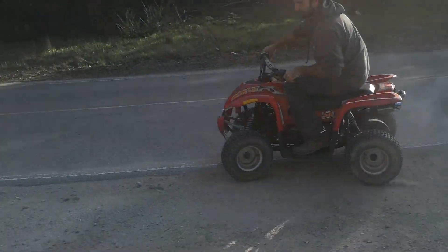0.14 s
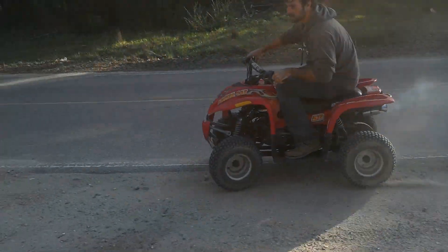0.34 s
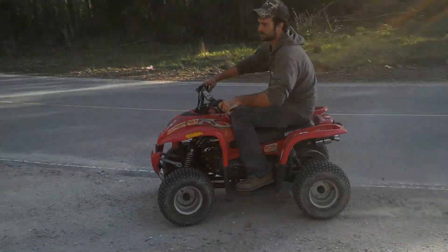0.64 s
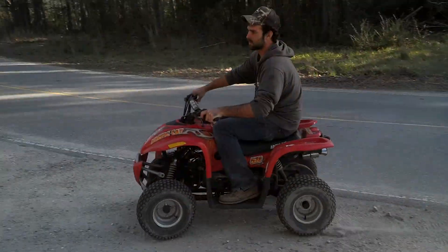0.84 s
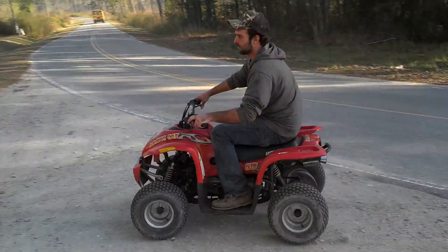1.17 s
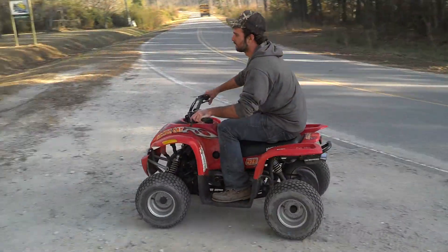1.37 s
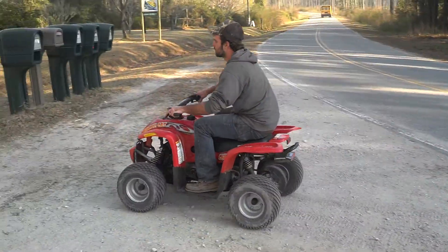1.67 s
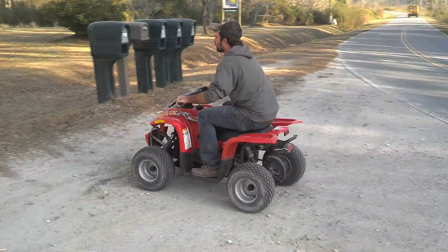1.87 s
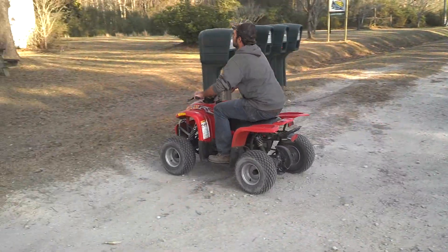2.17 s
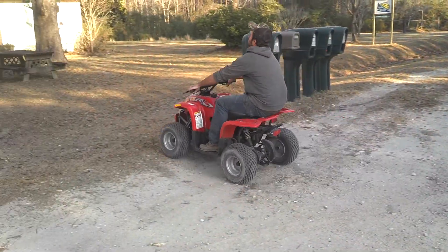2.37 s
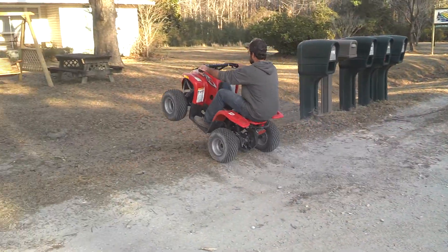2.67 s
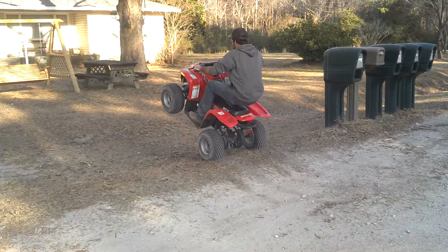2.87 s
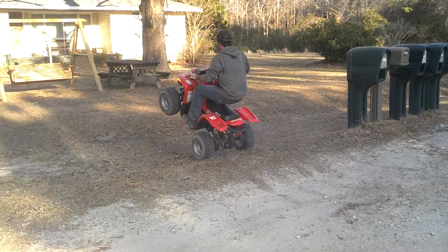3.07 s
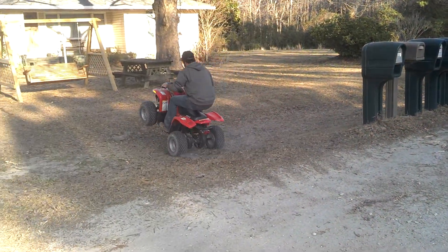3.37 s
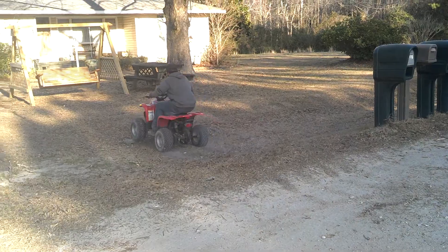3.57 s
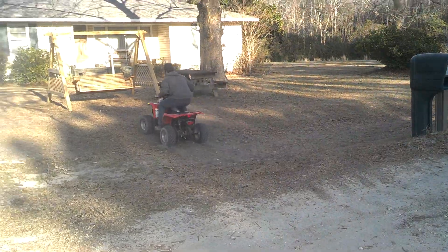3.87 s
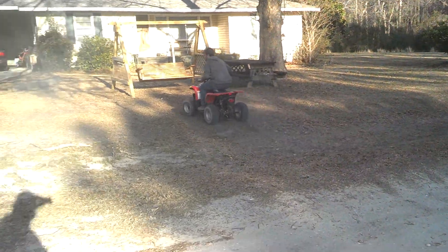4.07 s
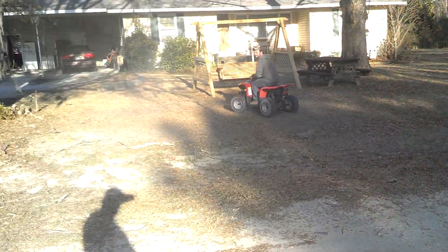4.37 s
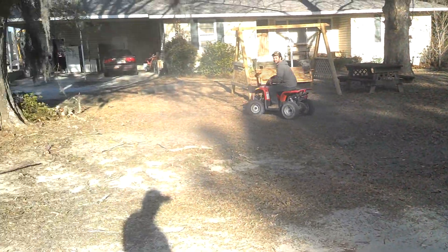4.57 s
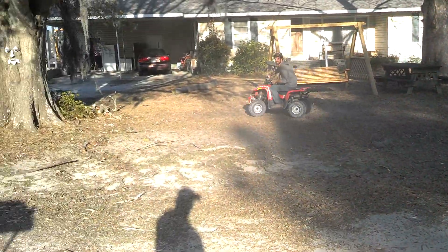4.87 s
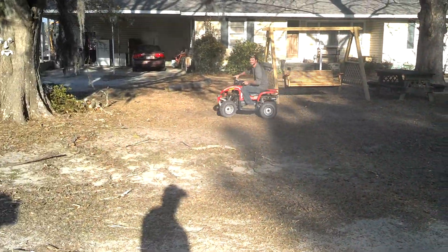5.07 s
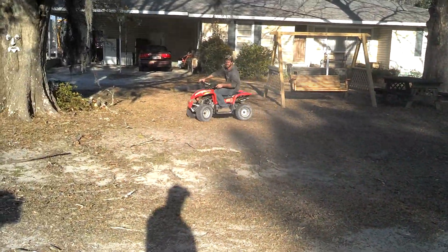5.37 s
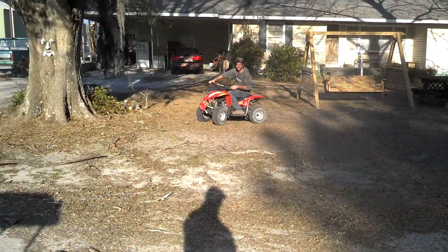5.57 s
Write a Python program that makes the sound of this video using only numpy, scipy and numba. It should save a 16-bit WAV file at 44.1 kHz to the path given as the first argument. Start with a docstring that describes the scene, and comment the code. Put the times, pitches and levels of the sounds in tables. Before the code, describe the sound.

Outdoors in a dirt yard, a small quad bike alternates between a continuous, raspy two-stroke buzz and uneven popping off the throttle. It starts under power, coasts, gives two rising revs, coasts again and finally pulls once more. A soft, gritty rush of tyres runs below the engine throughout. The microphone is a few metres off, giving a wide stereo sound with slight, dull reflections.

```python
"""A small two-stroke quad buzzes round a dirt yard, revving, then coasting with a stutter.
On throttle every crank turn fires; off throttle it catches for a few turns at a time.
Each turn's pulse rings the exhaust, silencer shell, tail pipe and fins, and trees and a house front
echo the engine. Tyres hiss on grit underneath, a few metres away, all in widened stereo."""
import sys
import numpy as np
from scipy import signal
from scipy.fft import rfft, irfft
from scipy.io import wavfile
from scipy.ndimage import uniform_filter1d
from numba import njit

SR = 44100
rng = np.random.default_rng(int(sys.argv[2]) if len(sys.argv) > 2 else 0)


def dump_mix(stems):
    """Bounce the given channels to the path in sys.argv[1] as a 16-bit WAV at rate SR."""
    frames = np.atleast_2d(stems).T  # one column per channel
    limited = np.clip(frames, -1, 1)  # hard clip at full scale
    pcm = np.round(limited * 32767).astype(np.int16)
    wavfile.write(sys.argv[1], SR, pcm)


N = 253134


def engine():
    """Exhaust pulses ring each part; levels and pitches shift as the quad shows another side."""
    # Each row: time in seconds, then thump, lower pipe, upper pipe, shell and rasp faders in dB.
    levels = [(0, -18, -14, -19.5, -34, -39), (.4, -15, -13.5, -23.5, -50, -36),
              (.75, -8.5, -11.5, -17, -34, -33), (.95, -18.5, -19.5, -25, -43, -32.5),
              (1.3, -20, -17.5, -18.5, -42, -32), (1.95, -17, -24.5, -21.5, -31.5, -35),
              (2.17, -13, -20.5, -22, -27, -27), (2.32, -17, -21.5, -21, -29.5, -26.5),
              (2.45, -8, -28.5, -52, -24.5, -36.5), (2.58, -6, -18.5, -42, -22, -28.5),
              (2.7, -10, -27.5, -28.5, -23, -32), (2.9, -13, -27, -25, -29, -33.5),
              (3.15, -8.5, -18, -48, -27.5, -31.5), (3.45, -13.5, -21, -49, -27, -28.5),
              (3.75, -9.5, -22, -40, -26.5, -30.5), (4, -13.5, -24.5, -34, -29.5, -35.5),
              (4.25, -15.5, -27, -24, -29, -31.5), (4.7, -12, -18, -31.5, -41, -34.5),
              (4.88, -10.5, -16, -23, -36.5, -34.5), (5, -9.5, -18, -26, -39, -33.5),
              (5.2, -6, -42, -22, -27.5, -37.5), (5.45, -11, -37, -30, -38, -45),
              (5.74, -11.5, -40, -31.5, -44, -41)]
    # Each row: time in seconds, lower, upper and tail pipe in Hz, end cap and header trims in dB.
    pipe_rings = [(0, 690, 1104, 3330, 5, -4), (.55, 691, 1120, 3340, 1, -12),
                  (.82, 716, 1097, 3330, 1.5, -13.5), (1, 700, 1050, 3305, -18, -7),
                  (1.3, 683, 1016, 3330, -14, 2), (1.7, 636, 970, 3300, -3.5, -1.5),
                  (2.15, 578, 932, 3370, 2.5, -2.5), (2.27, 860, 975, 3400, -9, -4.5),
                  (2.38, 817, 1074, 3240, 1, -7), (2.5, 760, 1150, 3330, 4, -13),
                  (2.7, 600, 1130, 3280, -1.5, -14.5), (3.05, 577, 960, 3220, 8.5, -11.5),
                  (3.22, 633, 1060, 3080, 7, -11), (3.45, 686, 1120, 3290, 4.5, -8),
                  (3.65, 624, 1104, 3200, 8, -12), (4, 554, 1054, 3300, 0.5, -10),
                  (4.25, 546, 1116, 3270, 1.5, -5.5), (4.55, 497, 1163, 3280, -4, -7.5),
                  (4.85, 520, 1113, 3260, 2, -2.5), (5.12, 510, 1050, 3330, -1.5, -10.5),
                  (5.4, 510, 1164, 3350, 5, -12.5), (5.74, 513, 1120, 3290, 3.5, -15)]
    # Each row: time in seconds, shock in dB, silencer box in Hz, upper shell in Hz and dB, end cap in Hz.
    facing = [(0, -47, 384, 1960, -31.5, 3650), (.5, -50, 370, 1914, -39.5, 3705),
              (.7, -36, 368, 1970, -26.5, 3840), (.85, -50, 422, 2060, -33.5, 3730),
              (1.1, -53, 363, 1780, -40, 3640), (1.6, -33, 350, 1980, -40, 3790),
              (2.1, -25.5, 358, 2070, -47, 3650), (2.3, -24, 410, 1910, -33, 3750),
              (2.47, -23.5, 426, 2150, -30, 3710), (2.7, -37, 430, 1980, -35.5, 3680),
              (2.95, -50, 392, 2010, -51, 3600), (3.15, -27, 388, 1980, -39, 3660),
              (3.4, -41, 383, 1830, -32, 3713), (3.65, -27, 408, 1880, -50, 3650),
              (4.2, -35, 380, 1820, -36.5, 3740), (4.75, -37, 429, 1850, -31, 3680),
              (5.1, -30, 462, 1920, -48, 3750), (5.4, -49, 430, 1880, -39, 3770),
              (5.55, -52, 419, 1920, -35, 3813), (5.74, -49, 401, 1910, -47, 3770)]
    # Each row: time in seconds, then puff, upper header trim, lower fin and upper fins in dB.
    outlet = [(0, -39, 4, -50, -62), (.8, -29, -0.5, -51, -50), (1.2, -36, -2, -50, -65),
              (1.7, -26, 0, -50, -57), (2.1, -31.5, 0, -52, -56), (2.4, -49, -2, -39, -41.5),
              (2.62, -43, -12, -41, -45), (3, -34, -1.5, -51, -55), (3.2, -48, -9.5, -41, -45),
              (3.58, -40.5, -7.5, -39, -37.5), (3.8, -18, -4.5, -51, -38), (3.95, -29, 1, -47, -45),
              (4.15, -33, -1, -47, -49), (4.4, -27, -0.5, -44, -55), (4.7, -37, 3, -45, -56),
              (4.9, -36, -0.5, -49, -58), (5.13, -56, -2, -45, -49), (5.4, -55, 3, -51, -56),
              (5.74, -56, -1, -56, -61)]
    # Steady resonances. Each gives pitch in Hz, width in Hz and relative weight in dB.
    box_overtone = (448.4, 173, -2)
    air_puff = [(520, 270, 0)]  # one swing of air at the outlet
    header_pipe = [(106, 44, -6), (221.3, 136, -0.5)]
    outlet_shock = [(845, 1070, 12), (2540, 400, -8)]
    silencer_shell = [(1559.6, 63, 0)]
    low_rasp = (3000, 200, -6)
    end_cap = [(3970, 320, -5.5), (4422, 90, -7.5), (4770, 170, -23)]
    fins = [(5400, 210, 0), (6660, 240, 3.5), (7330, 400, 0)]

    thump_db, low_db, high_db, shell_db, rasp_db = curves(levels)
    low_hz, high_hz, tail_hz, cap_db, drone_db = curves(pipe_rings)
    shock_db, box_hz, upper_shell_hz, upper_shell_db, cap_hz = curves(facing)
    puff_db, header_db, fin_db, top_fin_db = curves(outlet)
    hz, width, db = header_pipe[1]
    header = [header_pipe[0], (hz, width, db + header_db)]
    lead_s = .001  # the low parts arrive ahead of the tail pipe rasp
    part = cylinder()
    return (part([(box_hz, 307, 0), box_overtone], thump_db - 6.5, .09, unfired_db=-6.5, lead_s=lead_s)
            + part(air_puff, puff_db, .03, unfired_db=-30, lead_s=lead_s)
            + part(header, thump_db + drone_db, .09, unfired_db=-6, lead_s=lead_s)
            + part([(low_hz, 150, 0)], low_db, .06, unfired_db=-5.5, widen=2, lead_s=lead_s)
            + part([(high_hz, 80, 0)], high_db, .06, unfired_db=-9, widen=1.43, lead_s=lead_s)
            + part(outlet_shock, shock_db, .06, unfired_db=-55)
            + part([(upper_shell_hz, 150, 0)], upper_shell_db, .1, unfired_db=-21)
            + part(silencer_shell, shell_db, .1, unfired_db=-20)
            + part([low_rasp, (tail_hz, 190, 0)], rasp_db + .5, .11, unfired_db=-40, flicker_db=3)
            + part([(cap_hz, 130, 4)] + end_cap, rasp_db - 5 + cap_db, .11, unfired_db=-33, flicker_db=2)
            + part(fins[:1], fin_db, .4, unfired_db=-24, flicker_db=2.5)
            + part(fins[1:], top_fin_db, .4, unfired_db=-45, flicker_db=2))


def cylinder():
    """One port pulse a turn with a gas rush behind it; returns a function that rings a part with them."""
    turns, burn, spent_db = crank()
    turn = np.clip(turns, 0, None).astype(int)
    jitter, unevenness = rng.standard_normal((len(burn), 2)).T
    at = np.interp(np.arange(len(burn)), turns, np.arange(N)) + 8e-6 * SR * jitter
    at = np.clip(at, 0, N - 1)
    size = undb(np.where(burn > 0, .9, 1.3) * unevenness) * np.sqrt(N / len(burn))
    gas = rng.standard_normal(N) * np.exp(-(turns % 1) / .5)
    gas /= rms(gas)

    def part(modes, db, roughness, unfired_db, widen=1, lead_s=0, flicker_db=0):
        """One ringing part, at db when every turn burns fully; an unfired turn only pumps air."""
        push = np.maximum(burn, undb(unfired_db + spent_db))
        rush = gas * (roughness + .35 * (burn[turn] == 0))  # unburnt mixture tumbles out more raggedly
        full_burn = rms(ring(clicks(at, size) + roughness * gas, modes, widen))
        drive = np.roll(clicks(at, size * push) + rush * push[turn], -int(lead_s * SR))
        return undb(db + flicker_db * wander(14)) * ring(drive, modes, widen) / full_burn

    return part


def crank():
    """Crank angle in turns, and how fully each turn burns (gain) or pumps (dB)."""
    # Speed climbs on throttle and sags off it. Each row: time in seconds, turns a second.
    crank_speed = [(0, 101.1), (.25, 103.3), (.51, 101.7), (.64, 104.4), (.83, 110.1), (1.02, 98.52),
                   (1.17, 94.33), (1.43, 89.52), (1.7, 87.28), (2.15, 84.85), (2.38, 105.2), (2.49, 109.9),
                   (2.67, 105.2), (2.76, 104.4), (3.06, 88.8), (3.18, 98.57), (3.32, 105.1), (3.47, 107.9),
                   (3.63, 106.4), (3.95, 94.7), (4.2, 87.96), (4.72, 81.37), (4.95, 93.64), (5.15, 98.4),
                   (5.29, 94.36), (5.5, 101.5), (5.61, 100), (5.74, 91)]
    # Runs of fired turns. Each row: start and length in seconds, strength in dB, then trims in dB
    # for the first turn and for the half-caught turn before it.
    firing_runs = [(0.002, 0.9, -3.5, -0.5, -6), (0.9282, 0.051, -1, 0, -14), (1.015, 0.037, 0.5, 0, -15),
                   (1.108, 0.019, 0.5, 0.5, -6), (1.193, 0.018, 0.5, -2, -5), (1.2673, 0.027, 0, -3.5, -6),
                   (1.3433, 0.017, -1, -1, -9), (1.43, 0.023, -0.5, -0.5, -10), (1.52, 0.019, 2.5, -2, -9),
                   (1.6203, 0.018, 2, -2, -6), (1.713, 0.038, -1.5, -2.5, -10),
                   (1.817, 0.024, 1.5, 0.5, -6), (1.909, 0.028, 1.5, -3, -14),
                   (1.9927, 0.022, 0.5, -2, -23), (2.074, 0.02, -1, -3, -22), (2.146, 0.626, -2.5, -5, -25),
                   (2.811, 0.033, -1.5, 0, -4), (2.892, 0.029, 0, -2.5, -20),
                   (2.9763, 0.021, -4.5, 0.5, -9), (3.053, 0.58, -4.5, -0.5, -25),
                   (3.6837, 0.032, -5.5, -3.5, -9), (3.781, 0.019, -2, -3.5, -25),
                   (3.861, 0.021, -4.5, -10, -24), (3.944, 0.014, -5.5, 1.5, -4),
                   (4.0092, 0.023, -3.5, -1, -22), (4.1077, 0.0233, -2, -1.5, -24),
                   (4.211, 0.023, -1, -6, -23), (4.3004, 0.025, -2, -1, -17), (4.394, 0.023, 0, -5, -23),
                   (4.4865, 0.0242, -3, -1, -9), (4.5802, 0.026, -2.5, -2.5, -20),
                   (4.677, 0.017, -1.5, -1, -15), (4.747, 0.504, -6.5, -3, -22),
                   (5.279, 0.0314, -3.5, -2.5, -8), (5.3322, 0.4, -2, 0.5, -6)]
    hz, = curves(crank_speed)
    start, length, strength_db, first_db, catch_db = np.transpose(firing_runs)
    t, onset = np.arange(N) / SR, (start * SR).astype(int)
    turns = np.cumsum(hz) / SR
    first = np.round(turns[onset])
    turns += np.interp(t, start, first - turns[onset])  # every run opens on a whole turn
    turn = np.arange(int(turns[-1]) + 2)
    begins = np.interp(turn, turns, t)[:, None]
    into_run = turn[:, None] - first
    share = (into_run >= 0) * np.clip((start + length - begins) * hz[onset], 0, 1)  # last turn: partial
    share *= np.where(into_run == 0, undb(first_db), 1)
    burn = (share * undb(strength_db)).max(axis=1)
    catch = ((into_run == -1) * undb(strength_db + catch_db)).max(axis=1)
    # after a run the cylinder is spent; fresh charge builds up until the next
    last = np.maximum.accumulate(np.where(burn > 0, turn, 0))
    following = np.minimum.accumulate(np.where(burn > 0, turn, turn[-1] + 1)[::-1])[::-1]
    spent_db = -6.5 * (following - turn) / np.maximum(following - last, 1)
    return turns, np.maximum(burn, catch), spent_db


def tyres():
    """Knobbly tyres on grit: two independent streams of dense grains that swell together."""
    # Road edge, then dirt further off. Each row: time in seconds, rush in dB, treble hiss in dB.
    rolling = [(0, -27, -47.5), (.8, -27, -48), (1.2, -26, -49.5), (1.9, -28, -54.5), (2.4, -26, -47),
               (2.95, -31, -56), (3.3, -30, -53), (3.75, -28.5, -46), (4.35, -31.5, -56),
               (4.9, -31.5, -54.5), (5.3, -29.5, -53.5), (5.74, -30, -53.5)]
    # Tone of the grit. Each row: frequency in Hz, relative level in dB.
    grit = [(25, -28), (40, -27), (60, -21), (150, -13), (300, -14.5), (600, -19), (1000, -22.5),
            (1500, -26), (2600, -28), (4000, -36.5), (6000, -46.5), (9000, -55.5), (12000, -64),
            (15500, -73.5)]
    rush_db, hiss_db = curves(rolling)
    hz, grit_db = np.transpose(grit)
    f = np.fft.rfftfreq(N, 1 / SR)
    colour = undb(np.interp(np.log(f + 1), np.log(hz), grit_db))
    grains = rfft(rng.standard_normal((2, N)) * undb(1.2 * rng.exponential(size=(2, N)))) * colour
    treble = 1 / (1 + (6000 / (f + 1)) ** 4)
    rush, hiss = irfft(grains * (1 - treble), N), irfft(grains * treble, N)
    bumps = undb(wander(13))
    return bumps * (undb(rush_db) * rush / rms(rush) + undb(hiss_db) * hiss / rms(hiss))


def yard(x, t60=.3, wet_db=-20, start_s=.012, dull_hz=2500):
    """Adds scattered, dull echoes from ground, trees and house front."""
    t = np.arange(int(.4 * SR)) / SR
    echoes = rng.standard_normal(len(t)) * np.exp(-np.log(1000) * t / t60) * (t > start_s)
    echoes = signal.lfilter(*signal.butter(1, dull_hz, fs=SR), echoes)
    return x + undb(wet_db) * signal.fftconvolve(x, echoes / np.sqrt(np.sum(echoes ** 2)))[:N]


def ring(x, modes, widen):
    """Resonances of alternating sign, filtered twice for dark valleys; widen sharpens the attack."""
    out = 0
    for k, (hz, width, db) in enumerate(modes):
        centre = hz * np.ones(N)
        once = moving_bandpass(x, centre, float(width))
        twice = moving_bandpass(once, centre, float(widen * width))
        out += (-1) ** k * undb(db) * twice / np.sqrt(width)
    return out


@njit
def moving_bandpass(x, hz, width):
    """State-variable band-pass with a moving centre, gain 1 there."""
    y, band, low = np.empty(len(x)), 0., 0.
    for i in range(len(x)):
        g, damping = np.tan(np.pi * hz[i] / SR), width / hz[i]
        v = (band + g * (x[i] - low)) / (1 + g * (g + damping))
        band, low, y[i] = 2 * v - band, low + 2 * g * v, damping * v
    return y


def clicks(at, size):
    """One click at each fractional sample position, shared between two samples."""
    out, whole = np.zeros(N + 1), at.astype(int)
    np.add.at(out, whole, size * (1 - at % 1))
    np.add.at(out, whole + 1, size * (at % 1))
    return out[:N]


def wander(hz):
    """Smoothed random steps, hz a second, with a spread near 1."""
    hold = int(SR / hz)
    steps = np.repeat(rng.standard_normal(N // hold + 1), hold)
    return 1.3 * uniform_filter1d(uniform_filter1d(steps, hold), hold)[:N]


def curves(table):
    """Automation curves from a time table, one value a sample."""
    seconds, *columns = np.transpose(table)
    return [np.interp(np.arange(N) / SR, seconds, c) for c in columns]


def undb(db):
    """dB to gain."""
    return 10 ** (np.asarray(db) / 20)


def rms(x):
    """Root mean square."""
    return np.sqrt(np.mean(x ** 2))


def scene():
    """The quad in widened stereo: the left is an inverted, late, coloured copy of the right,
    its hiss partly its own."""
    # Left against right. Each row: frequency in Hz, phase lag in half cycles, level in dB,
    # likeness of the hiss from 0 to 1.
    stereo_image = [(0, 1, -3.8, 0), (35, 1.025, -3.8, .3), (65, 1.047, -3.9, 1), (258, 1.187, -4.1, 1),
                    (968, 1.716, -2.9, 1), (2153, 2.56, -1.6, .9), (2650, 3, 0, 1), (2850, 3, 0, 1),
                    (3445, 3.61, 3.5, .9), (4306, 4.49, 4, .85), (4850, 5, 0, 1), (5050, 5, 0, 1),
                    (6029, 6, -.3, .95), (7536, 6.93, -4.5, .6), (8613, 7.8, -4, .5), (10000, 9, 0, 1),
                    (10450, 9, 0, 1), (11843, 10.1, -5, .3), (16000, 13, -2, .4)]
    motor = yard(engine())
    hiss, other_hiss = tyres()
    hz, *columns = np.transpose(stereo_image)
    lag, db, likeness = (np.interp(np.fft.rfftfreq(N, 1 / SR), hz, c) for c in columns)
    spectrum = rfft(motor) + likeness * rfft(hiss) + np.sqrt(1 - likeness ** 2) * rfft(other_hiss)
    left = irfft(spectrum * undb(db) * np.exp(-1j * np.pi * lag), N)
    return np.array([left, motor + hiss])


def record(dry, bass_hz=70, top_hz=15650):
    """Drops the deep bass, rounds the loudest peaks and cuts the top."""
    thinned = signal.sosfilt(signal.butter(2, bass_hz, "high", fs=SR, output="sos"), dry)
    rounded = np.tanh(1.008 * thinned) / .86
    return signal.sosfilt(signal.ellip(10, .2, 80, top_hz, fs=SR, output="sos"), rounded)


dry = scene()
out = record(dry)
dump_mix(out)
```